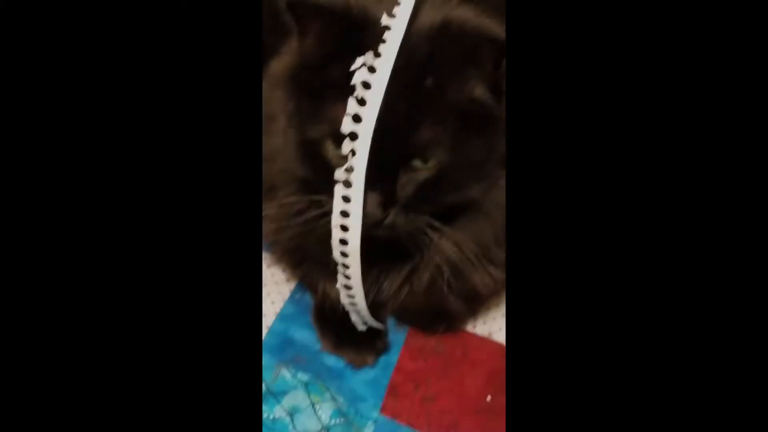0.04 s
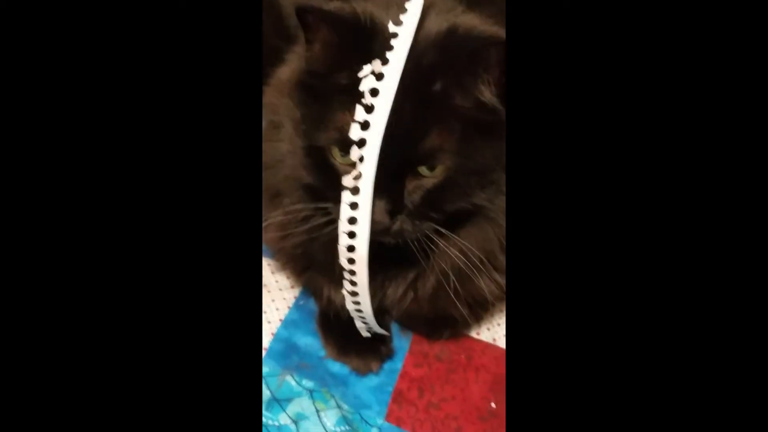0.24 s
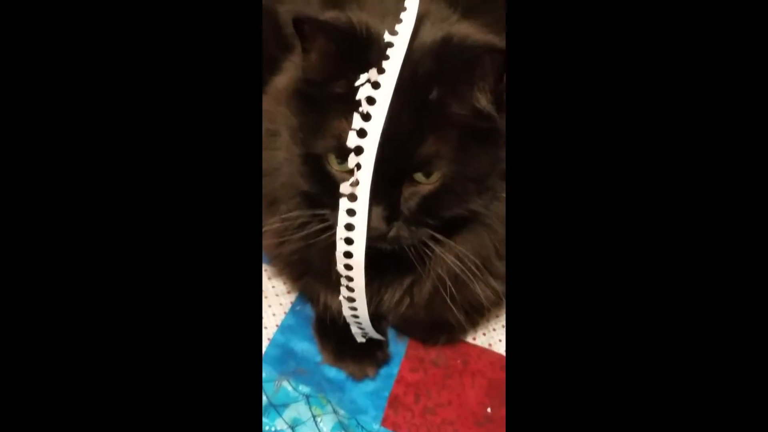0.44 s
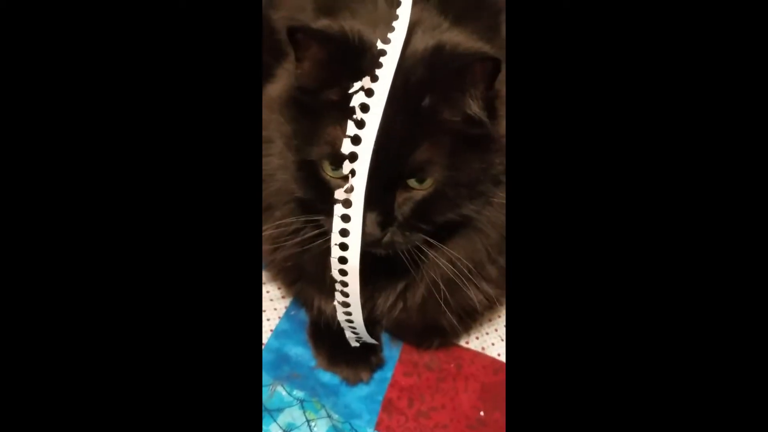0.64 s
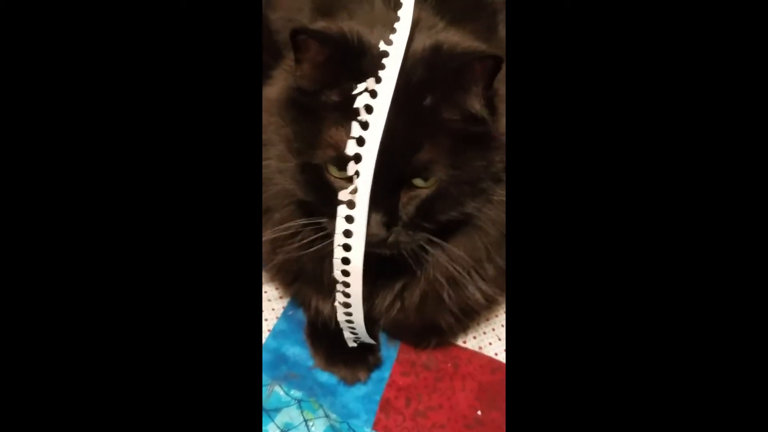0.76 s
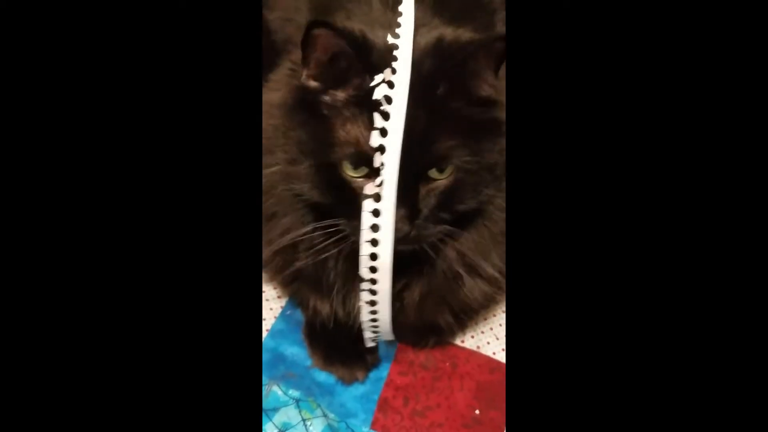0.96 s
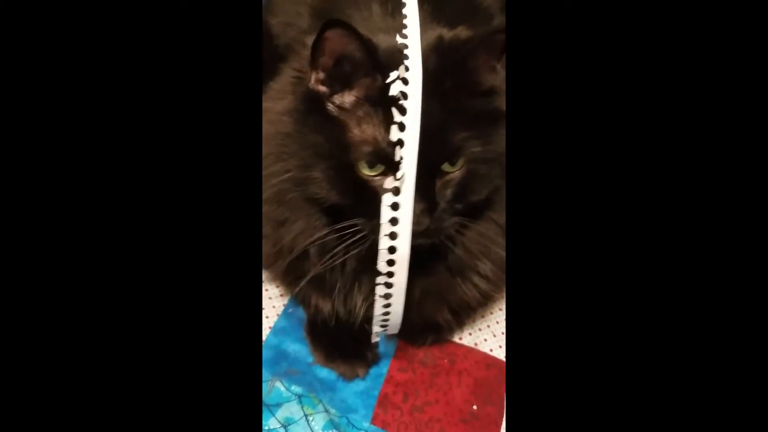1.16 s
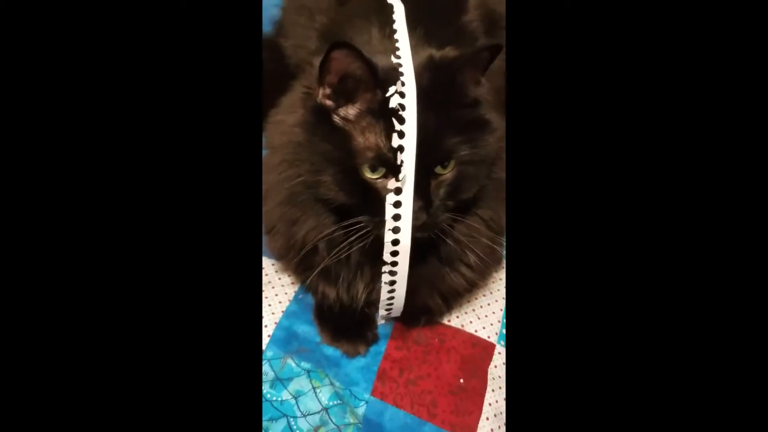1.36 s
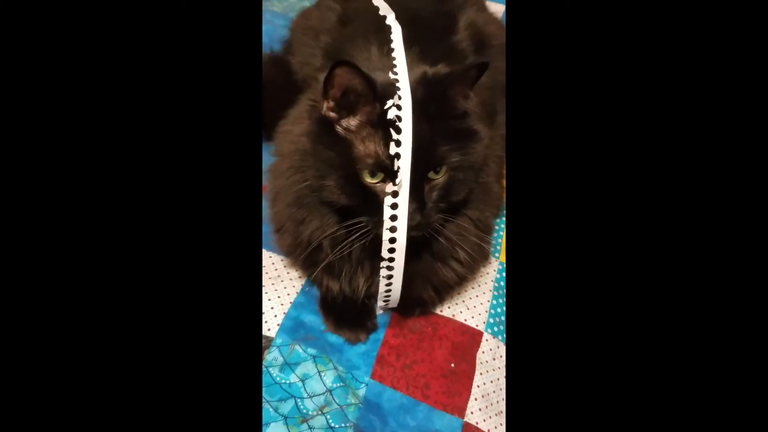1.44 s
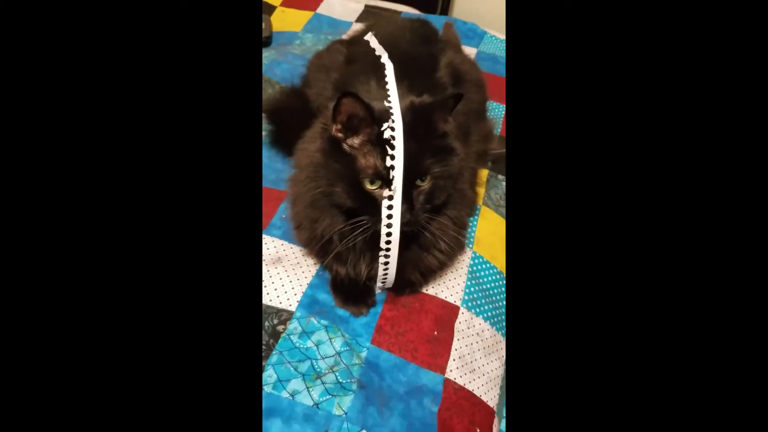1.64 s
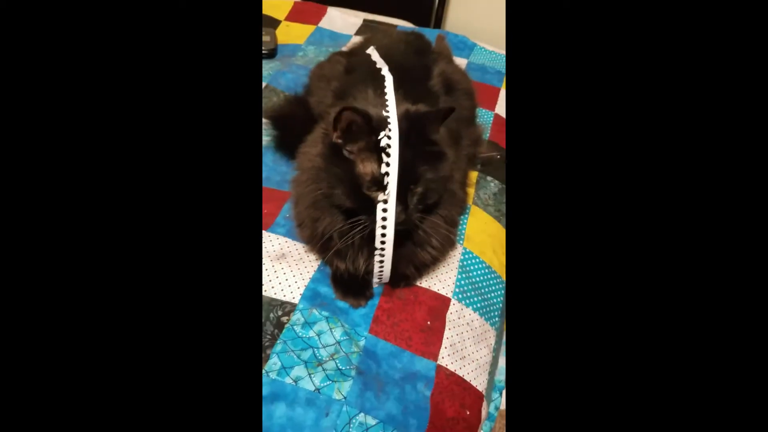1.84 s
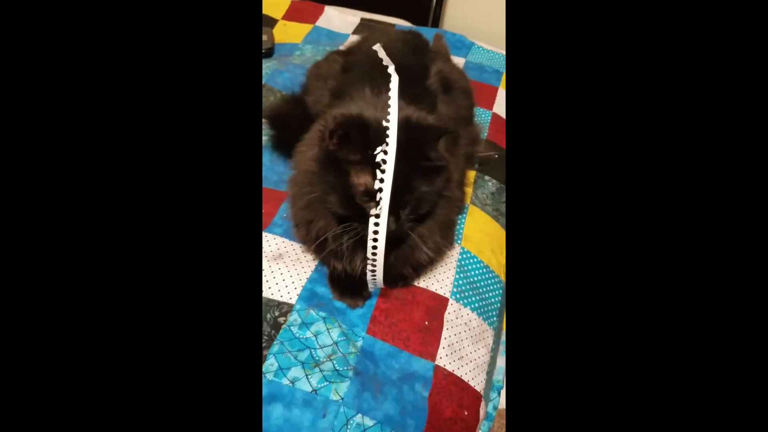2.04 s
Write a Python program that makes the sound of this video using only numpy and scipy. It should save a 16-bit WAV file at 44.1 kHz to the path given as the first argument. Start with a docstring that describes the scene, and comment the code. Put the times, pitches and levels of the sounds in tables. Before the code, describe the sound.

Fingers rubbing and bumping a phone close to the microphone, with soft dull thumps.

```python
"""A quiet room, where a hand shifts its grip on a phone. Skin slides over the case with stick-slip
friction: first a light hiss with a few bright brushes, then a coarse rumble and a deep shudder
as the hand presses beside the microphone. Fingers bump the case, which swings in the grip as a
damped oscillator, giving dull thumps, many with a short scuff as the finger settles.
Under it all lie a faint room rumble and microphone hiss."""
import sys
import numpy as np
from scipy import signal
from scipy.fft import rfft, irfft
from scipy.io import wavfile
from scipy.ndimage import uniform_filter1d

SR = 44100
rng = np.random.default_rng(int(sys.argv[2]) if len(sys.argv) > 2 else 0)


def master_out(mix):
    """Clip the mix to full scale and print it as 16-bit PCM to the path in sys.argv[1]."""
    frames = np.transpose(np.atleast_2d(mix))
    ceiling = np.clip(frames, -1, 1)
    pcm = np.round(ceiling * 32767).astype(np.int16)
    wavfile.write(sys.argv[1], SR, pcm)


N = 92610


def undb(db):
    """Amplitude ratio of a level in decibels."""
    return 10 ** (np.asarray(db) / 20)


def curve(rows, t):
    """Envelope through (s, dB) points, with exponential decay after the last."""
    at, db = np.array(rows).T
    return undb(np.interp(t, at, db)) * np.exp(-np.maximum(t - at[-1], 0) / 0.011)


def swell(t, at, rise_s, decay_s):
    """Envelope with a Gaussian rise to its peak and an exponential decay."""
    return np.exp(-(np.minimum(t - at, 0) / rise_s) ** 2 - np.maximum(t - at, 0) / decay_s)


def colour(x, points):
    """Spectral shaping: x filtered through (Hz, dB) points and scaled to rms 1."""
    hz, db = np.array(points).T
    f = np.maximum(np.arange(N // 2 + 1) * SR / N, 1)
    shaped = irfft(rfft(x) * undb(np.interp(np.log(f), np.log(hz), db)), N)
    return shaped / shaped.std()


def drift(rate_hz):
    """Moving averages smooth white noise into a slow fluctuation of unit spread."""
    width = int(SR / rate_hz)
    slow = uniform_filter1d(uniform_filter1d(rng.standard_normal(N), width), width)
    return slow / slow.std()


def friction(spectrum, catches_per_s=2000, spread_db=4, smooth_share=0.64, peak_width_hz=20):
    """Stick-slip friction: tiny uneven catches of the skin over a smooth rub."""
    # Narrow peaks that colour the rubbing noise. Each row: frequency in Hz, boost in dB.
    rub_peaks = [(352, 11), (470, 7), (555, -1), (615, 4.5), (692, 2), (773, 1.5), (925, 2.5)]
    caught = rng.random(N) < catches_per_s / SR
    catches = caught * rng.standard_normal(N) * undb(spread_db * rng.standard_normal(N))
    rub = np.sqrt(1 - smooth_share) * catches / catches.std()
    rub += np.sqrt(smooth_share) * rng.standard_normal(N)
    peaks = np.zeros(N)
    for hz, db in rub_peaks:
        band = signal.iirpeak(hz, hz / peak_width_hz, fs=SR)
        peaks += (undb(db) - 1) * signal.lfilter(*band, rub)
    return colour(rub + peaks, spectrum)


def room(t, level_db=-61.5, waver_db=3.3, bass_start_db=-28, rise_s=0.13):
    """Noise floor: room rumble and microphone hiss, with bass that comes up and then wavers."""
    # Spectrum of the background. Each row: frequency in Hz, relative level in dB.
    spectrum = [(20, -4.5), (50, -1.5), (107, -2.5), (150, -5), (300, -17.5), (450, -19.5), (800, -26.5),
                (1500, -30), (3500, -35.5), (6000, -43.5), (9000, -45.5), (12000, -40.5), (15500, -35.5)]
    steady = colour(rng.standard_normal(N), spectrum)
    bass = signal.sosfiltfilt(signal.butter(2, 300, fs=SR, output="sos"), steady)
    bass_db = bass_start_db * np.maximum(1 - t / rise_s, 0) - waver_db * drift(rate_hz=12)
    return undb(level_db) * (steady + bass * (undb(bass_db) - 1))


def glide(t):
    """Sliding friction under light pressure: skin hisses over the case."""
    # Envelope of the hiss. Each row: time in seconds, level in dB.
    levels = [(0, -52.5), (.016, -50), (.038, -61), (.06, -57.5), (.08, -94), (.092, -76), (.102, -49.5),
              (.122, -49.5), (.16, -52), (.208, -52.5), (.218, -44.5), (.255, -45.5), (.276, -60.5),
              (.292, -44), (.312, -43), (.338, -54.5), (.355, -74)]
    # Spectrum of the light rub. Each row: frequency in Hz, relative gain in dB.
    spectrum = [(100, -21), (400, -2.5), (1000, -1), (2100, 0), (3600, -7.5), (5400, -21.5), (7000, -31.5),
                (8600, -40.5), (11000, -29.5), (15000, -22.5)]
    return curve(levels, t) * friction(spectrum)


def brushes(t, edge_ratio=1.44):
    """The lightest touches on the case give bursts of band-limited noise: bright brushes and ticks."""
    # Each row: peak time in seconds, level in dB, rise and decay in seconds, band centre in Hz.
    touches = [(0.017, -53, 0.015, 0.012, 2670), (0.116, -53, 0.015, 0.018, 3750),
               (.176, -62, .0006, 0.00072, 3830), (0.187, -70, 0.0004, 0.00057, 4130),
               (0.926, -58, 0.00082, 0.00047, 2950)]
    out = np.zeros(N)
    for at, db, rise_s, decay_s, hz in touches:
        band = signal.butter(3, [hz / edge_ratio, hz * edge_ratio], "band", fs=SR, output="sos")
        hiss = signal.sosfilt(band, rng.standard_normal(N))
        out += undb(db) * swell(t, at, rise_s, decay_s) * hiss / hiss.std()
    return out


def drag(t):
    """Sliding friction under firm pressure: skin grips and drags with a coarse rumble."""
    # Envelope of the rumble. Each row: time in seconds, level in dB.
    levels = [(0, -74), (.06, -60.5), (.08, -70), (.11, -76), (.16, -48.5), (.21, -44.5), (.22, -33.5),
              (.256, -28), (.276, -31.5), (.29, -26), (.312, -23.5), (.344, -37), (.358, -71), (.40, -67)]
    # Spectrum of the firm rub. Each row: frequency in Hz, relative gain in dB.
    spectrum = [(25, -31), (100, -7.5), (190, 8.5), (340, -2.5), (520, -1), (800, -6.5), (1300, -13),
                (2100, -26), (3600, -48.5), (7000, -67), (9000, -61), (15000, -49)]
    return curve(levels, t) * friction(spectrum)


def shudder(t):
    """Random vibration at low frequency: the sliding hand leaves the case shuddering."""
    # Envelope of the shudder. Each row: time in seconds, level in dB.
    levels = [(.13, -72), (.17, -46), (.21, -73.5), (.27, -33), (.32, -30.5), (.36, -43.5), (.40, -59),
              (.47, -62.5), (.51, -51), (.56, -67.5)]
    # Spectrum of the shudder. Each row: frequency in Hz, relative level in dB.
    spectrum = [(20, -12), (45, -1), (90, 15), (150, 0.5), (250, -30), (500, -25), (2000, -72)]
    return curve(levels, t) * colour(rng.standard_normal(N), spectrum)


def thumps(t, grip_q=1.2, trim_db=-1.5, mic_low_hz=22):
    """Damped mass and spring: after a soft push the hand-held case stops within a cycle or two."""
    # Finger bumps, the first of them a sharp catch of the dragging skin. Each row: time in seconds, # relative
    # peak level in dB, contact time scale in milliseconds, ring frequency in Hz (for the bumps, # the natural
    # frequency of the case in the grip).
    bumps = [ (0.2973, -12, 0.66, 246), (0.381, -66, 1.9, 84), (0.4141, -27.5, 1.5, 84),
             (0.4465, -31, 1.36, 87.4), (0.5348, -34, 1.6, 85), (0.7748, -25, 1.93, 64.8),
             (0.8047, -27, 1.6, 75.4), (0.938, -15, 1.15, 54), (0.9522, -30, 0.27, 100),
             (0.963, -24, 1.46, 98), (1.0855, -21, 1.22, 48.2), (1.2498, -17, 1.07, 65.3),
             (1.268, -35.5, 1.3, 67.6), (1.337, -13.5, 0.86, 103.6), (1.3505, -22.5, 1.5, 73.5),
             (1.668, -25, 1.37, 58), (1.7006, -27.5, 1.57, 66), (1.73, -34, 2, 48.6),
             (1.9534, -39.5, 1.21, 198)]
    mic_highpass = signal.butter(1, mic_low_hz, "high", fs=SR)
    out = np.zeros(N)
    for at, db, contact_ms, hz in bumps:
        contact_time = (t - at) * 1000 / contact_ms
        push = np.exp(1 - np.sqrt(1 + contact_time ** 2)) ** 2
        omega = 2 * np.pi * hz
        oscillator = signal.bilinear([1, 0, 0], [1, omega / grip_q, omega * omega], SR)
        acceleration = signal.lfilter(*oscillator, push)
        thump = signal.lfilter(*mic_highpass, acceleration)
        out += undb(db + trim_db) * thump / np.abs(thump).max()
    return out


def scuffs(t):
    """Transient friction: a finger rubs briefly and dully as it settles."""
    # Short rubs. Each row: peak time in seconds, level in dB, rise and decay in seconds.
    rubs = [ (0.377, -38.5, 0.0023, 0.012), (0.782, -35, 0.0091, 0.017), (0.799, -31.5, 0.0075, 0.0084),
            (0.946, -19.5, 0.01, 0.0089), (1.092, -30, 0.0047, 0.0086), (1.254, -33.5, 0.0056, 0.0074),
            (1.34, -25.5, 0.0044, .010), (1.673, -51, 0.0093, 0.024), (1.698, -45, 0.019, 0.0055),
            (1.737, -46.5, 0.0081, 0.021)]
    # Spectrum of a scuff. Each row: frequency in Hz, relative gain in dB.
    spectrum = [(25, -5.5), (70, 5.5), (200, 7), (380, -11), (700, -16.5), (1200, -26.5), (2200, -41.5),
                (4000, -54.5), (8000, -75)]
    envelope = sum(undb(db) * swell(t, at, rise_s, decay_s) for at, db, rise_s, decay_s in rubs)
    return envelope * friction(spectrum)


def scene():
    """Superposition: all sounds add at one microphone, with no echo."""
    t = np.arange(N) / SR
    slide = shudder(t) + glide(t) + drag(t)
    return (slide + thumps(t) + scuffs(t) + brushes(t) + room(t))[None]


def record(dry, top_hz=15800):
    """Band limiting: the phone's steep low-pass filter cuts the highest treble."""
    return signal.sosfilt(signal.ellip(12, .1, 80, top_hz, fs=SR, output="sos"), dry)


dry = scene()
out = record(dry)
master_out(out)
```